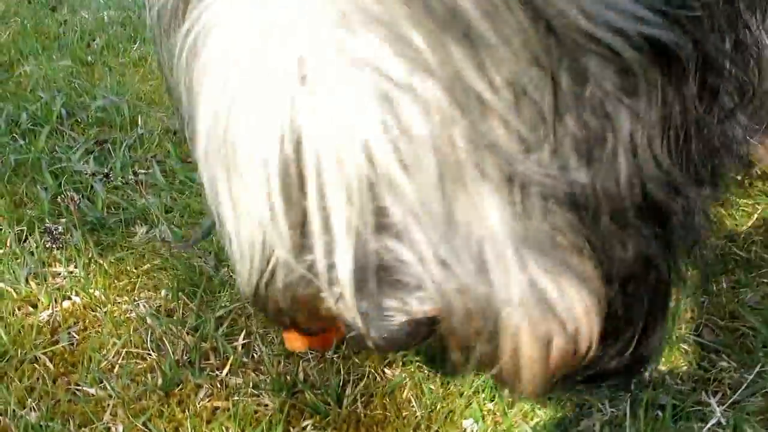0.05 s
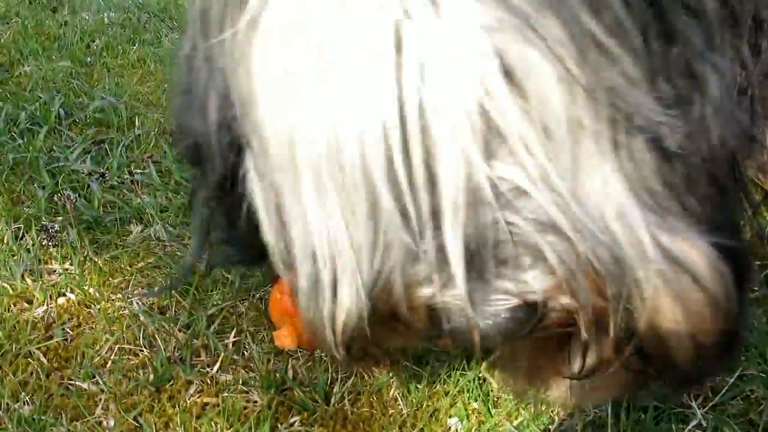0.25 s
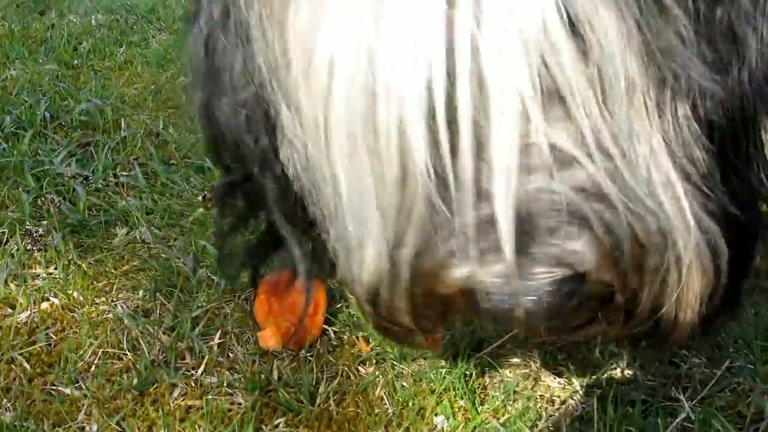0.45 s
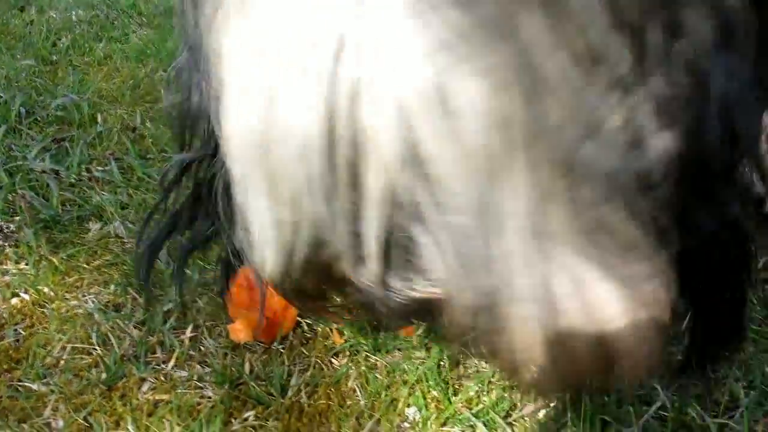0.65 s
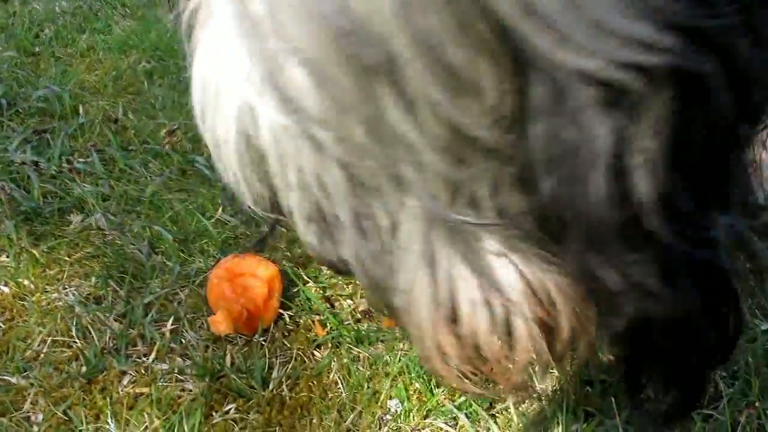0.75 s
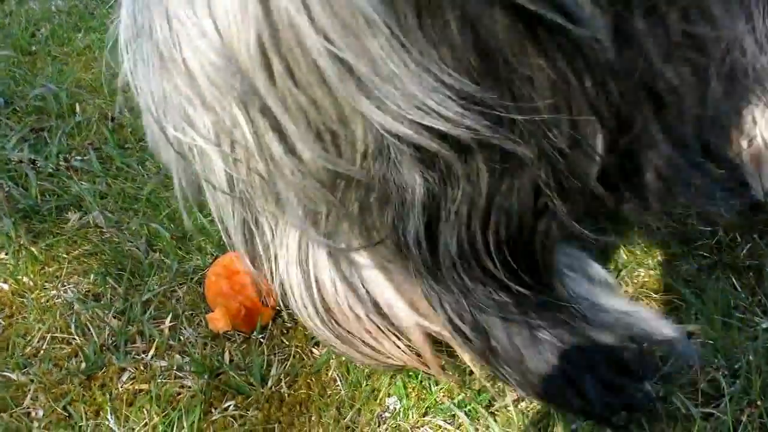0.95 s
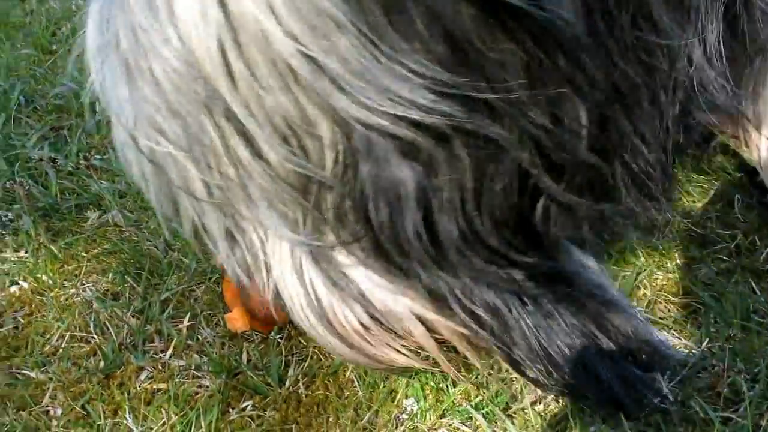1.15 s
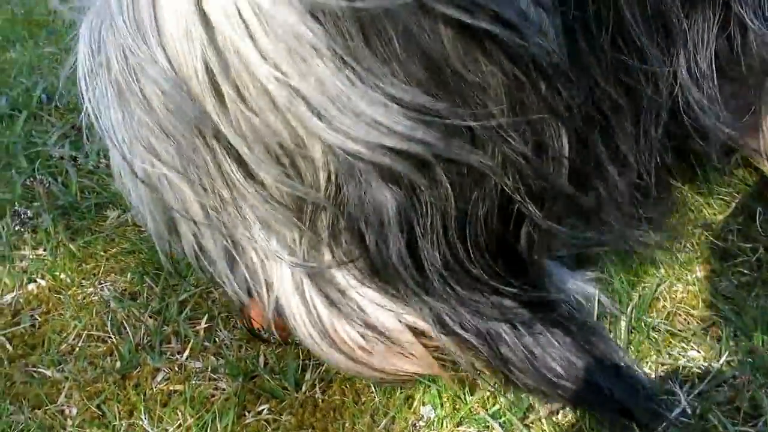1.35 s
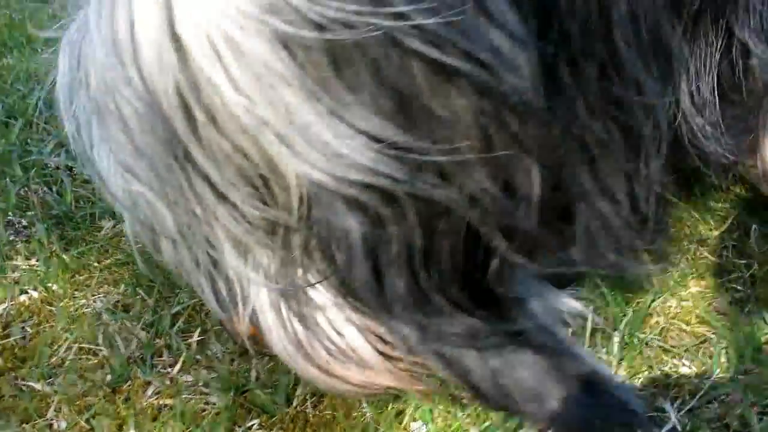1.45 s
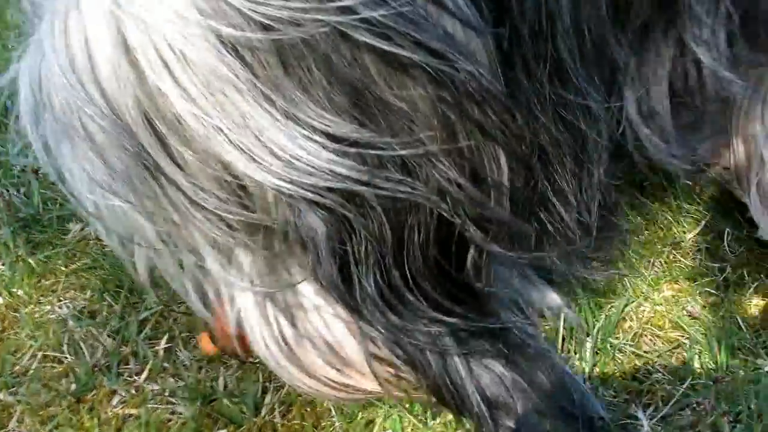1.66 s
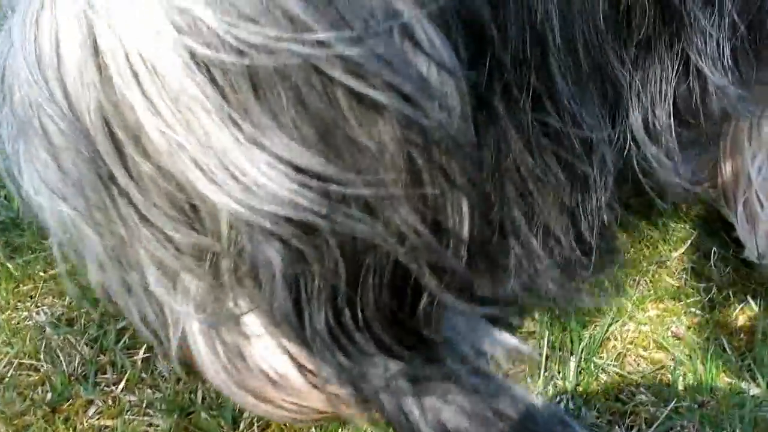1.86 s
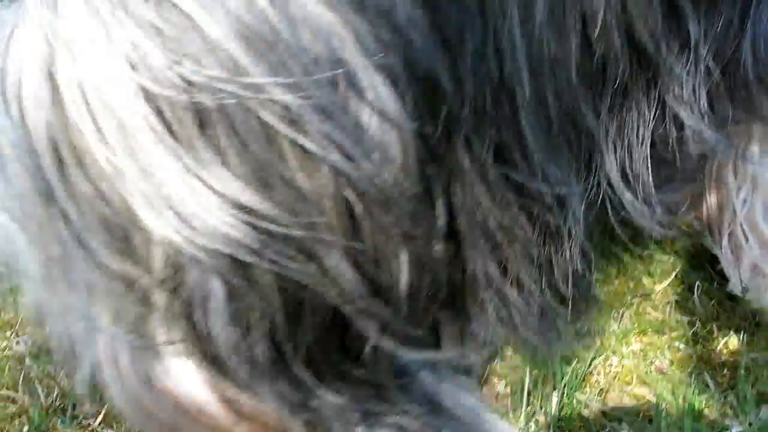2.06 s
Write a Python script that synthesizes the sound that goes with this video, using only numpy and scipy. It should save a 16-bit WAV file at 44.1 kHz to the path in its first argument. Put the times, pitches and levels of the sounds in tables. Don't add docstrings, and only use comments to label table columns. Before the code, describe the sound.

A dog chews a raw carrot very close to the microphone: hollow mouth pops, crackling crunches, sharp snaps and low thuds, busiest in the first second, then sparser, with sparrow chirps and soft garden air behind.

```python
import sys
import numpy as np
from scipy import signal
from scipy.fft import rfft, irfft
from scipy.io import wavfile
from scipy.ndimage import uniform_filter1d

SR = 44100
rng = np.random.default_rng(int(sys.argv[2]) if len(sys.argv) > 2 else 0)


def bounce(signal):
    frames = np.transpose(np.atleast_2d(signal))
    limited = np.clip(frames, -1, 1)
    pcm = np.round(limited * 32767).astype(np.int16)
    wavfile.write(sys.argv[1], SR, pcm)


def gain_from_db(level_db):
    decades = np.asarray(level_db, float) / 20
    return 10 ** decades


N = 92610


def unit_rms(x):
    return x / np.sqrt(np.mean(x ** 2) + 1e-20)


def band(x, low_hz, high_hz, order=2):
    sos = signal.butter(order, [low_hz, min(high_hz, .45 * SR)], "band", fs=SR, output="sos")
    return signal.sosfilt(sos, x)


def at_hz(points, hz):
    table_hz, value = np.transpose(points)
    return np.interp(np.log(hz), np.log(table_hz), value)


def drift(rate_hz):
    knots = rng.standard_normal(400)
    path = np.interp(np.arange(N) / SR * rate_hz, np.arange(400), knots)
    return uniform_filter1d(path, size=100) * 1.2


def add(out, start_s, piece):
    i = max(int(start_s * SR), 0)
    out[i:i + len(piece)] += piece[:N - i]


# [f/Hz, level/dB]
AIR_COLOUR = [(150, 16), (250, -1.5), (436, 2), (628, -0.5), (1190, 0.5), (3390, -16), (4880, -4),
              (5230, -14.5), (15900, -24)]
# [f/Hz, share from 0 to 1]
LIKENESS = [(200, 0.92), (900, 0.0049), (6800, 0.26)]


def air():
    out = 0
    edges = 200 * 2 ** np.arange(0, 6.6, .5)
    white = rng.standard_normal((2, 2, N))
    for k, (low, high) in enumerate(zip(edges, edges[1:])):
        mid, side = band(white[k % 2], low, high)
        hz = np.sqrt(low * high)
        alike = np.clip(at_hz(LIKENESS, hz), -1, 1)
        pair = np.sqrt(1 + alike) * mid + np.sqrt(1 - alike) * side * [[1], [-1]]
        flicker_db = 1.5 * drift(12)
        out = out + gain_from_db(at_hz(AIR_COLOUR, hz) + flicker_db) * pair
    return gain_from_db(-47.5) * unit_rms(out)


# [t/s, level/dB, f/Hz]
POPS = [(0.0015, -36, 1670), (0.0977, -33, 1710), (0.1095, -30, 1860), (0.0736, -48, 1950),
        (0.2071, -28, 1660), (0.2336, -33, 1160), (0.2402, -28, 1470), (0.2762, -32, 1690),
        (0.2821, -26.5, 2190), (0.3864, -25, 1380), (0.432, -33.5, 1120), (0.4509, -26.5, 1860),
        (0.4588, -28, 1290), (0.522, -29, 1140), (0.5882, -36.5, 1450), (0.6637, -36.5, 1183),
        (0.675, -29, 1060), (0.738, -35, 1360), (0.723, -45.5, 1150), (0.7, -36, 1510), (0.802, -28, 502),
        (0.834, -27.5, 2360), (0.8454, -28, 1210), (0.853, -26, 996), (0.856, -31, 920),
        (0.8175, -34.5, 1180), (0.928, -37, 1100), (0.9532, -38, 1480), (0.958, -36.5, 1340),
        (0.9617, -32, 1470), (0.992, -41, 1220), (0.9987, -23.5, 1205), (1.027, -44, 1180),
        (1.1075, -38.5, 570), (1.2223, -32.5, 584), (1.2224, -33.5, 1310), (1.256, -43, 1320),
        (1.314, -37.5, 2080), (1.4105, -40.5, 780), (1.414, -43, 816), (2.055, -44.5, 600)]


def pops():
    ring_cycles, rise_cycles, crack_db = 3.5, 1.06, -6.5
    out, t = np.zeros(N), np.arange(700) / SR
    for s, db, hz in POPS:
        noise = rng.standard_normal(700)
        decay = np.exp(-t * hz / ring_cycles * 2)
        wobble = 1 + 0.16 * unit_rms(uniform_filter1d(noise, size=40))
        turn = 2 * np.pi * hz * np.cumsum(wobble) / SR
        octave_below = gain_from_db(-6.0) * np.sin(turn / 2) * decay
        rise = np.minimum(t * hz / rise_cycles, 1)
        ring = (np.sin(turn) + octave_below) * decay * rise
        crack = gain_from_db(crack_db) * uniform_filter1d(noise, size=9) * decay ** 5.7
        add(out, s - .001, gain_from_db(db + 12.5) * (ring + crack))
    return out


# [t/s, level/dB]
SHUFFLE = [(.03, -45.5), (0.058, -39), (.3, -36), (.46, -32), (.61, -50), (0.689, -38), (.755, -63),
           (0.789, -29), (.9, -40), (.95, -35), (1.13, -41.5), (1.24, -45), (1.34, -42), (1.5, -41.5),
           (1.6, -55), (1.71, -44.5), (1.78, -51), (1.88, -40.5), (1.97, -47), (2.05, -48)]


def shuffle():
    s, db = np.transpose(SHUFFLE)
    level_db = np.interp(np.arange(N) / SR, s, db)
    lumps_db = 4 * drift(34.85)
    return gain_from_db(level_db + lumps_db) * unit_rms(band(rng.standard_normal(N), 62.5, 176))


# [t/s, level/dB, f/Hz]
THUDS = [(0.1623, -26.5, 201), (0.136, -40, 127), (0.242, -31, 141), (0.254, -24.5, 137), (0.323, -32, 177),
         (0.343, -39, 126), (0.455, -20.5, 140), (0.536, -30.5, 152), (0.568, -34.5, 170),
         (0.781, -32.5, 152), (0.869, -28, 204), (0.177, -22, 115), (0.2247, -25, 192), (0.2953, -27, 109),
         (0.3727, -23, 111), (0.3924, -39, 119), (0.4075, -19.5, 161), (0.435, -31, 141), (0.466, -21, 214),
         (0.6544, -22, 223), (0.7932, -23, 172), (0.8103, -23, 212), (0.822, -19, 227),
         (0.8377, -17.5, 163), (0.8518, -21.5, 134), (0.701, -33, 94), (0.881, -22, 247),
         (0.892, -22.5, 147), (1.0438, -18, 170), (1.0865, -23, 175), (1.186, -32.5, 122),
         (1.266, -32, 106), (1.2912, -29.5, 138), (1.348, -27.5, 147), (1.3675, -25, 155),
         (1.395, -36, 126), (1.407, -40.5, 169), (1.4593, -25.5, 140), (1.5, -29.5, 147), (1.691, -25, 131),
         (1.839, -25.5, 146), (1.8514, -25, 120), (1.831, -23.5, 117), (2.034, -31.5, 110),
         (0.057, -37, 154), (0.991, -31, 170)]


def thuds():
    width_cycles, half = 0.47, 1000
    out, phases = np.zeros(N), rng.uniform(0, 2 * np.pi, size=60)
    for (s, db, hz), phase in zip(THUDS, phases):
        turns = np.arange(-half, half) / SR * hz
        push = np.cos(2 * np.pi * turns + phase) * np.exp(-(turns / width_cycles) ** 2)
        add(out, s - half / SR, gain_from_db(db + 3.5) * push)
    return out


def body(tears, resonances):
    tear_colour_db, patchy_db = 4.5, 3.0
    out = 0
    for hz, width_hz, db in resonances:
        strength_db = tear_colour_db * rng.standard_normal(N) + patchy_db * drift(59.9)
        struck = tears * gain_from_db(strength_db) * rng.choice([-1, 1], N)
        r = np.exp(-np.pi * width_hz / SR)
        ring = signal.lfilter([1, 0, -1], [1, -2 * r * np.cos(2 * np.pi * hz / SR), r * r], struck)
        out = out + gain_from_db(db) * unit_rms(ring)
    return unit_rms(out)


# [t/s, length/s, mouth level/dB, crisp level/dB]
BITES = [(0.059, 0.078, -40.5, -49.5), (0.199, 0.065, -38, -45.5), (0.252, 0.077, -36, -49.5),
         (0.367, 0.023, -33.5, -51), (0.413, 0.06, -39.5, -47.5), (0.508, 0.035, -37.5, -41),
         (0.543, 0.019, -41, -52), (0.562, 0.049, -46.5, -55.5), (0.652, 0.038, -34.5, -42),
         (0.718, 0.027, -39.5, -59), (0.806, 0.088, -43.5, -56), (0.946, 0.019, -39, -52.5),
         (0.977, 0.061, -49.5, -57), (1.092, 0.065, -43.5, -49), (1.309, 0.043, -45.5, -50),
         (1.452, 0.083, -46, -51.5), (1.6, 0.11, -46, -54.5), (1.7, 0.058, -66, -53.5)]
# [f/Hz, width/Hz, level/dB]
MOUTH = [(544, 78, -10), (1095, 210, 1), (1680, 270, 0), (2350, 530, -2.5), (3800, 2700, -2)]
# [f/Hz, width/Hz, level/dB]
CRISP = [(4700, 580, 3.5), (6700, 1600, 5.5), (9850, 2500, 2.9), (12000, 1200, -10), (14100, 3800, -37)]


def bites():
    tears_per_s, spread_db, fizz_db = 2000, 3.8, -5.5
    t, dull, crisp = np.arange(N) / SR, 0, 0
    size = gain_from_db(spread_db * np.minimum(rng.exponential(1, N), 4))
    tears = unit_rms(size * (rng.random(N) < tears_per_s / SR))
    for s, length, mouth_db, crisp_db in BITES:
        edge = .25 * length
        nearest_end = np.minimum((t - s) * 2 + edge, s + length + edge - t)
        shape = np.clip(nearest_end / edge / 2, 0, 1) ** 2
        dull = dull + gain_from_db(mouth_db) * shape
        crisp = crisp + gain_from_db(crisp_db) * shape
    in_mouth = body(tears + gain_from_db(fizz_db - 18.5), MOUTH)
    in_carrot = body(tears + gain_from_db(fizz_db), CRISP)
    return dull * in_mouth + crisp * in_carrot


# [t/s, level/dB, f/Hz]
KNOCKS = [(.0635, -32, 503), (.0755, -31, 420), (.088, -33, 440), (.1115, -27.5, 417), (.121, -31.5, 580),
          (.241, -42, 524), (.317, -31, 443), (.462, -27, 570), (.488, -47, 410), (.955, -32, 510),
          (.988, -31, 440), (1.2565, -44, 600), (1.3145, -34, 487), (1.3205, -26.5, 426), (1.327, -29, 580),
          (1.3445, -37, 480), (1.361, -34, 420), (1.472, -36, 445), (1.498, -41, 328), (1.635, -41, 497),
          (1.674, -34, 740), (1.683, -37, 850)]


def knocks():
    width_cycles, half = 0.7, 300
    out = np.zeros(N)
    for k, (s, db, hz) in enumerate(KNOCKS):
        turns = np.arange(-half, half) / SR * hz
        push = np.cos(2 * np.pi * turns + k) * np.exp(-(turns / width_cycles) ** 2)
        add(out, s - half / SR, (-1) ** k * gain_from_db(db + 3.5) * push)
    return out


# [t/s, level/dB, centre f/Hz]
SNAPS = [(0.0881, -45, 9900), (0.1858, -42.5, 7600), (0.2293, -43, 11500), (0.2454, -45, 10400),
         (0.2707, -39.5, 11000), (0.284, -45.5, 9400), (0.317, -42.5, 8600), (0.377, -37, 10900),
         (0.4012, -47.5, 8300), (0.4022, -32.5, 4700), (0.382, -34.5, 4400), (0.843, -39, 3870),
         (0.85, -53, 9050), (0.426, -47, 8800), (0.5196, -24.5, 9000), (0.5449, -36, 9932.0),
         (0.6502, -48, 8100), (0.659, -60, 10993.0), (0.6777, -31, 10100), (0.697, -46, 12112.0),
         (0.713, -39.5, 12200), (0.8345, -29.5, 11100), (0.956, -59, 8800), (0.9804, -45, 10000),
         (1.321, -46.5, 9900), (1.595, -53, 7000), (1.694, -51, 4000), (1.707, -53.5, 9200),
         (1.749, -48.5, 5200)]


def snaps():
    snap_s, width, body_db = 0.0011, 0.14, -2.5
    out, t = np.zeros(N), np.arange(400) / SR
    for s, db, hz in SNAPS:
        burst = rng.standard_normal(400) * t / snap_s * np.exp(-t / snap_s * 2) * 5.46
        bright = band(burst, hz * (1 - width), hz * (1 + width))
        broad = gain_from_db(body_db) * band(burst, 1700, 9900)
        add(out, s - snap_s / 2, gain_from_db(db + 12.0) * (bright + broad))
    return out


def whistle(rows, start_s, db):
    s, hz, level_db = np.transpose(rows)
    t = np.arange(N) / SR - start_s
    ends = np.clip(np.minimum(t - s[0], s[-1] - t) / .004, 0, 1)
    turn = 2 * np.pi * np.cumsum(np.interp(t, s, hz)) / SR
    voice = np.sin(turn) + gain_from_db(-26) * np.sin(2 * turn)
    return np.sqrt(2) * gain_from_db(db + np.interp(t, s, level_db)) * ends * voice


# [t/s, level/dB, top voice f/Hz]
SPARROW = [
    (.412, -46.0, 5300),
    (1.068, -42.5, 5500),
    (1.832, -40.0, 5950),
]
# [t/s, f/Hz, level/dB]
UPSTROKE = [(0, 2700, -20), (.010, 4450, -11), (.013, 4650, -9), (.030, 4400, -16)]
# [t/s, f/Hz, level/dB]
GLIDE = [(.010, 3600, -15), (.029, 3780, -8), (.040, 4400, -10), (.047, 4880, -3), (.053, 4970, -2),
         (.060, 4870, -5), (.064, 4750, -12), (.070, 4550, -18)]
# [t/s, f/Hz, level/dB]
OVERTONE = [(.014, 5500, -23), (.022, 5400, -19), (.034, 5150, -25)]


def sparrow():
    top_s, top_length_s, top_db = .051, .019, -11
    wall_s, wall_db = .098, -15.0
    calls = np.zeros(N)
    for s, db, hz in SPARROW:
        top = [(top_s, hz, top_db), (top_s + top_length_s, hz * (1 - .08), top_db)]
        for part in (UPSTROKE, GLIDE, OVERTONE, top):
            calls = calls + whistle(part, s, db)
    calls = calls * gain_from_db(3.5 * drift(180) + 4.5)
    return calls + gain_from_db(wall_db) * np.roll(calls, int(wall_s * SR))


# [t/s, length/s, start f/Hz, end f/Hz, level/dB]
THRUSH = [
    (1.500, .036, 2800, 1500, -46.0),
    (1.560, .010, 3750, 3700, -54),
    (1.644, .028, 2680, 1700, -43.5),
]


def thrush():
    notes = np.zeros(N)
    for s, length, from_hz, to_hz, db in THRUSH:
        notes = notes + whistle([(0, from_hz, 0), (length, to_hz, -3.0)], s, db)
    return notes * gain_from_db(1.75 * drift(170))


def garden(x):
    t60_s = .55
    t = np.arange(30000) / SR
    tail = rng.standard_normal((2, 30000)) * gain_from_db(-60 * t / t60_s) * np.minimum(t / 0.0038, 1)
    return signal.fftconvolve(x[None], tail / np.sqrt(np.sum(tail[0] ** 2)), axes=1)[:, :N]


def birds():
    near, far = sparrow(), thrush()
    left = near * gain_from_db(4.5) + far
    right = np.roll(near, shift=2) * gain_from_db(2.5) + far
    return np.array([left, right]) + garden(gain_from_db(-7.0) * near + gain_from_db(4.5) * far)


def ports(x):
    lead_s, treble = .00007, 0.58
    t = np.arange(600) / SR
    scatter = rng.standard_normal((2, 600)) * np.exp(-t / .005)
    scatter = scatter / np.sqrt(np.sum(scatter[0] ** 2))
    hz = np.arange(N // 2 + 1) * SR / N
    late = irfft(rfft(x) * np.exp(-2j * np.pi * hz * lead_s), N)
    top = band(x, 11270, 27000)
    left = x + treble * top
    right = late - treble * band(late, 9300, 16500)
    scattered = signal.fftconvolve((x + gain_from_db(-15) * 2 * top)[None], scatter, axes=1)[:, :N]
    return np.array([left, right]) + gain_from_db(-6.5) * scattered


def scene():
    low = thuds() + shuffle()
    skew = gain_from_db(-31) * band(low, 208, 600) * 10
    ground = np.array([low - skew, low + skew])
    mouth = bites() + pops() + snaps() + knocks()
    return ports(mouth) + ground + birds() + air()


def top_cut(x):
    return signal.sosfilt(signal.butter(12, 16060, fs=SR, output="sos"), x)


def record(dry):
    x = signal.sosfilt(signal.butter(3, 60, "high", fs=SR, output="sos"), dry)
    x = signal.sosfilt(signal.ellip(12, 1, 80, 15880, fs=SR, output="sos"), x)
    return top_cut(x)


dry = scene()
out = record(dry)
bounce(out)
```